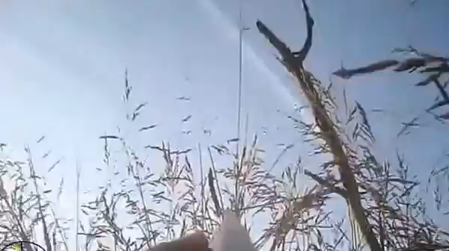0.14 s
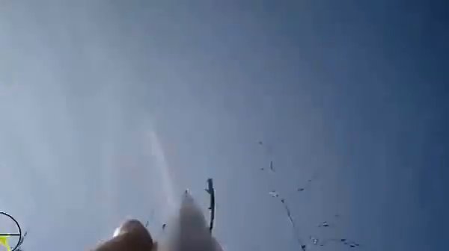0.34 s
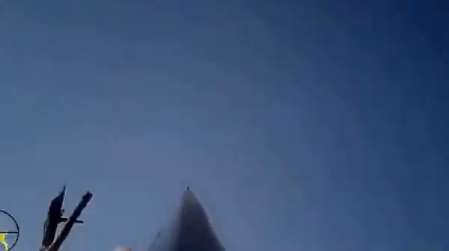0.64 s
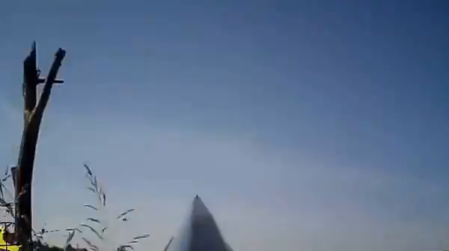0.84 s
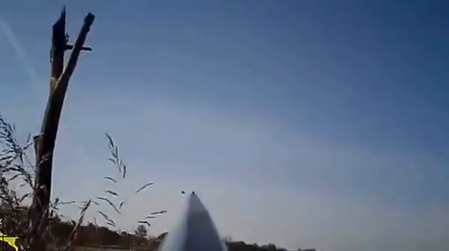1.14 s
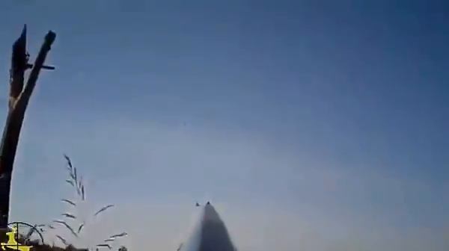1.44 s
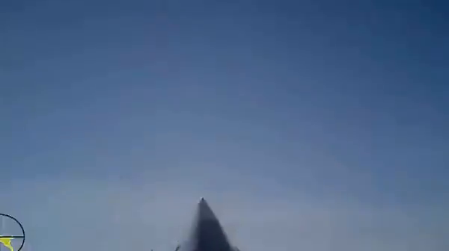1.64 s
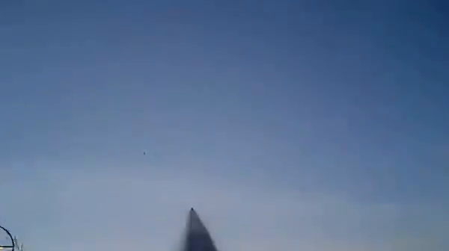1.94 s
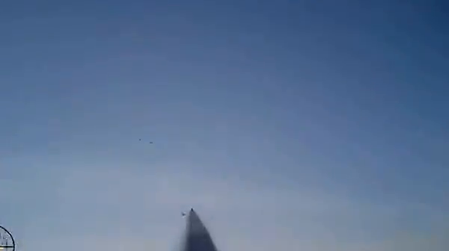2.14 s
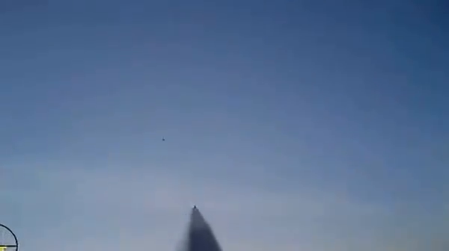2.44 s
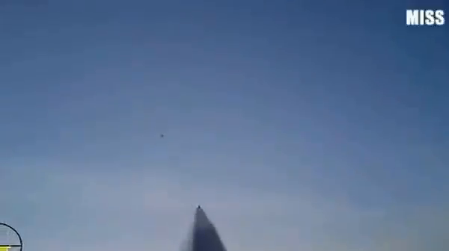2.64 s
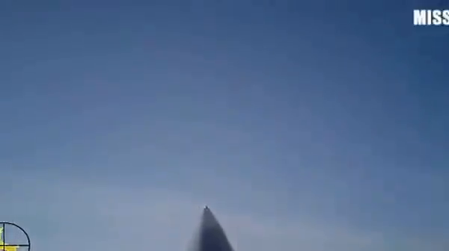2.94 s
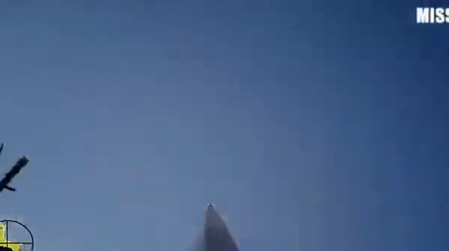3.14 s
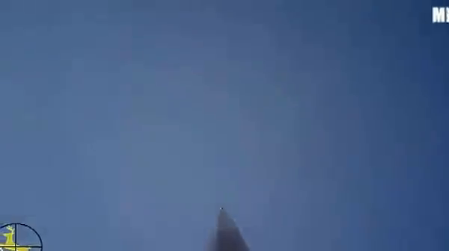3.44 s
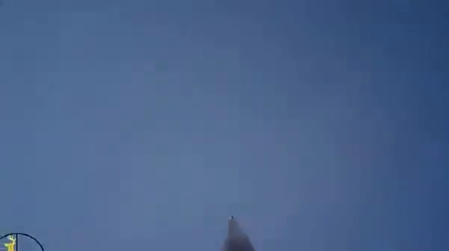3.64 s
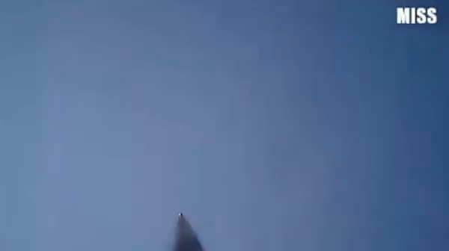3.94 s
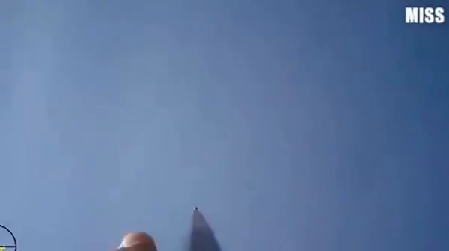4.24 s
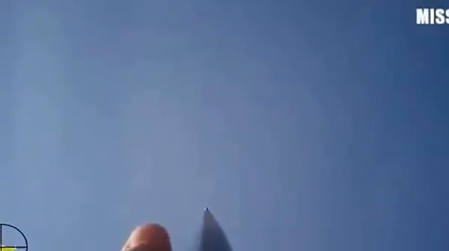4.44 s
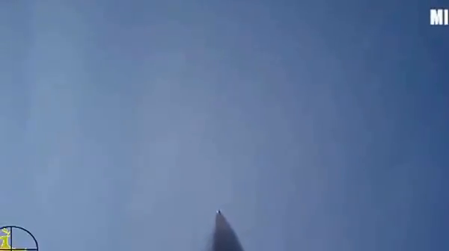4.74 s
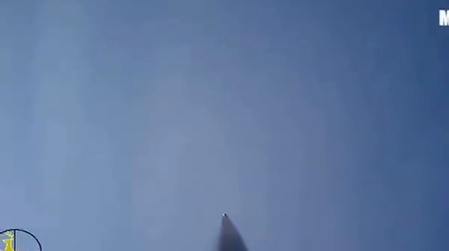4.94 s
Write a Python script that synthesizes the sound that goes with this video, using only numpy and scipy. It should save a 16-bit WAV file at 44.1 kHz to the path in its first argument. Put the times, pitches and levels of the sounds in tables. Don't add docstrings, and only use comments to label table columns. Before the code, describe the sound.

A pump shotgun fires three times very close to the microphone, its steel action clicking and slamming over faint breeze and grass rustle.

```python
import sys
import numpy as np
from scipy import signal
from scipy.fft import rfft, irfft, next_fast_len
from scipy.io import wavfile
from scipy.ndimage import uniform_filter1d, map_coordinates

SR = 44100
rng = np.random.default_rng(int(sys.argv[2]) if len(sys.argv) > 2 else 0)


def dump_mix(stems):
    frames = np.atleast_2d(stems).T
    limited = np.clip(frames, -1, 1)
    pcm = np.round(limited * 32767).astype(np.int16)
    wavfile.write(sys.argv[1], SR, pcm)


def ratio(d):
    e = np.asarray(d, float) / 20
    return 10 ** e


N = 225389

# start in seconds, gas roar in dB, hold in seconds, t60 in seconds,
# pressure push in dB.
SHOTS = [
    (0.7147, 3, 0.0059, 0.0082, 7),
    (1.6286, 6, 0.012, 0.036, 8.5),
    (2.401, -1.5, 0.0057, 0.056, 4.5),
]
# start in seconds, stock, body and bolt levels in dB, t60 in seconds.
RECOILS = [
    (.7157, 2, 4, -1.5, 0.03),
    (1.6287, -10, -3, 7, 0.06),
    (1.652, -7.5, -2.5, -16.5, 0.048),
    (2.4027, 14, -2, 8, 0.017),
    (2.41, -8, 0, -9, 0.033),
]
# start in seconds, length in seconds, body in dB,
# bolt over body in dB.
SLIDES = [(0.475, 0.32, -47, -4.5), (0.7117, .007, -34, -7), (0.721, .024, -44, 16.5),
          (1.208, 0.073, -42.5, -5), (1.267, 0.021, -53, 8), (1.282, 0.018, -31.5, -9),
          (1.453, .04, -40, 1), (1.6227, .017, -22, -24), (1.651, 0.036, -28, 2.5),
          (1.739, 0.017, -26.5, -8), (1.998, 0.015, -27, -13), (2.291, 0.017, -46, 24.5),
          (2.338, 0.019, -28, -5), (2.358, 0.0087, -18, -3), (2.386, .007, -22, 4), (2.392, 0.011, -25, -9),
          (2.826, 0.046, -25.5, -4.5), (2.88, 0.016, -21, -4), (2.922, 0.0066, -24, -8),
          (2.948, 0.057, -28.5, -11), (2.997, 0.016, -14.5, -5), (3.015, 0.052, -23.5, -5.5),
          (3.456, .01, -41, -22), (3.981, 0.032, -42, -6.5), (4.234, .033, -37, -.5),
          (4.266, 0.016, -37, -3), (4.455, 0.26, -51.5, -8)]
# start in seconds, pitch in Hz, level in dB,
# t60 in seconds.
RINGS = [(0.1215, 2000, -0.5, 0.012), (.1213, 1424, -3.5, 0.0096), (0.1212, 1113, -25, 0.021),
         (.122, 1144, -43, 0.27), (.1222, 693, -44, 0.16), (.349, 2410, -14.5, 0.011),
         (0.349, 587, -30.5, 0.03), (.717, 450, -4, 0.041), (1.254, 14300, -25, .025),
         (1.258, 1356, -13.5, 0.026), (1.2575, 2730, -13, 0.016), (1.468, 1850, -17, 0.041),
         (2.0644, 265, -17.5, 0.039), (2.293, 126, -18, 0.026), (2.296, 12300, -36, 0.03),
         (2.387, 1220, 11.5, 0.016), (2.405, 1250, 2, 0.043), (2.7298, 7800, 11, 0.0023),
         (3.9815, 967, -17.5, 0.019), (2.7288, 13100, -3, 0.0047), (2.833, 130, -24, 0.029),
         (3.032, 218, -22.5, 0.079), (3.4473, 945, -14.5, 0.014), (3.9806, 4740, -21, 0.017),
         (3.9816, 1934, 4, 0.01), (3.982, 665, -37, 0.3), (3.982, 1740, -21.5, 0.079),
         (4.2383, 753, -21, 0.028), (4.2692, 1250, -29, 0.045), (5.1, 525, -44, 0.011)]
# start in seconds, body in dB, bolt over body in dB, t60 in seconds.
SLAMS = [(.4359, -28, -7, 0.011), (1.2546, -26.5, -2, 0.048), (1.421, -28.5, -8.5, 0.021),
         (1.4686, -38, -5, .05), (1.4731, -26, -1, 0.018), (1.6785, -29, -1, .018), (1.7215, -21, -6, .012),
         (1.8575, -18, -11, 0.0062), (2.0233, -17, -1.5, 0.019), (2.029, -9.5, -8.5, 0.024),
         (2.0635, 2, -4, 0.015), (2.287, 1, 0, .005), (2.2946, -7.5, 2.8, 0.022), (2.353, -16.5, -7, 0.017),
         (2.389, -5.5, -8, 0.019), (2.4341, -15.5, -13, 0.016), (2.7295, -44.5, 34, 0.0056),
         (2.8244, -16, -13, 0.013), (3.002, -20.5, 8, 0.0088), (3.0237, -28, -3, .012),
         (3.0316, -7.5, 1.5, .011), (3.0452, -11, 1, 0.011), (3.525, -21.5, -3.5, 0.0035),
         (3.9808, -7, -1.5, 0.0067), (4.2385, -31, 1, 0.024), (4.2737, -46, 2.5, 0.076)]
# start in seconds, body in dB,
# bolt over body in dB, t60 in seconds.
CATCHES = [(0.1209, -11, -5.5, 0.012), (.3486, -18, -4.5, 0.015), (.4501, -39, -1, .008),
           (0.4867, -34, -18, 0.012), (0.5623, -32.5, -12, 0.037), (0.6422, -24, -11, .0055),
           (0.7426, -12.5, -11, 0.0063), (0.9632, -28, -14, .028), (1.2365, -29, 0.5, 0.012),
           (1.736, -22, 4, 0.015), (1.862, -22.5, -28, 0.02), (2.013, -19.5, -1, .01),
           (2.0489, -21.5, -16, 0.038), (2.269, -14.5, -9, 0.013), (2.3656, -24, 5, 0.064),
           (2.381, -7.5, -2.5, 0.017), (2.832, -7.5, -31, 0.012), (2.8339, 1.5, -2.5, 0.0044),
           (2.846, -22, -8, .025), (2.8548, -24, -2, 0.0092), (2.8601, -6.5, 0, 0.0077),
           (2.8846, -24, -6.5, .0054), (2.8904, -27.5, 20, 0.0081), (2.894, -22, 5, 0.0051),
           (2.9214, -24.5, 8, 0.013), (2.9717, -13.5, -10.5, 0.017), (3.0173, -53, 1, 0.025),
           (3.4184, -46, 8.5, .004), (4.4807, -29, -7, .007), (4.6006, -29, -6, .006)]
# start in seconds, body in dB, t60 in seconds.
TAPS = [(0.216, -50, 0.023), (0.4946, -38, 0.007), (.5128, -30, 0.0088), (0.5507, -28, 0.0064),
        (.6714, -35, 0.008), (.686, -22.5, 0.0071), (.8904, -39, .008), (1.0017, -24, .007),
        (1.1102, -39, 0.0037), (1.2893, -31, 0.0032), (1.6853, -24, 0.043), (1.9386, -16, 0.008),
        (2.2084, -29, 0.0075), (2.2123, -38, .013), (2.6824, -24.5, 0.018), (2.7051, -24, 0.023),
        (2.754, -24.5, 0.0075), (2.7938, -27, .006), (3.447, -14, 0.01), (3.463, -33, .021),
        (3.4666, -24.5, 0.011), (3.5666, -31.5, 0.013), (3.5724, -33, 0.0032), (4.4055, -42, .0045),
        (4.412, -35.5, 0.0093), (4.5887, -31, 0.0046)]

# centre in Hz, width in Hz, level in dB.
BODY_MODES = [(1250, 1040, -2.5), (1850, 680, 3), (2354, 276, 4.5), (2532, 422, 0)]
# centre in Hz, width in Hz, level in dB.
STOCK_MODES = [(184, 155, -3), (450, 207, 1), (680, 236, 1.5), (971, 370, -4)]
# centre in Hz, width in Hz, level in dB.
BOLT_MODES = [(4210, 770, 2), (5310, 900, 0), (5790, 640, 3), (7035, 1800, -20)]
# centre in Hz, width in Hz, level in dB.
THIN_MODES = [(7800, 1500, -6.5), (10130, 1000, 2.5), (12300, 2260, 5.5), (14300, 1500, 4)]
# centre in Hz, width in Hz, level in dB.
SHELL_MODES = [(765, 1300, -2), (1830, 320, 8), (2610, 190, -3.5), (4090, 410, 2.5), (6140, 280, -5)]
PART_LASTS = [
    [0.96],
    [0.94],
    [1],
    [.6],
]

# frequency in Hz, density in dB per Hz.
ROAR = [(100, 13), (500, 1.5), (2000, 3.5), (6000, -5.5), (15000, -11)]
# frequency in Hz, density in dB per Hz.
LAND = [(35, -49), (60, -18.5), (460, -8.5), (608, -4.5), (1610, -8), (2220, -6.5), (2500, -4),
        (2940, -6.5), (6020, -6), (8920, -8), (14200, -9.5), (15200, -31)]
# frequency in Hz, density in dB per Hz.
BREEZE = [(12, -34), (20, -15), (128, -4), (155, -14), (329, -7.5), (500, -16), (650, -45.5), (1100, -120)]
# frequency in Hz, density in dB per Hz.
GRASS = [(210, -13.5), (350, -11.5), (470, -10), (648, -12.5), (1080, -14.5), (1180, -11), (2250, -18),
         (2520, -17), (3060, -23), (4320, -21), (7500, -27.5), (9750, -55), (16500, -120)]
# frequency in Hz, density in dB per Hz.
HISS = [(3820, -25), (6500, -8), (9070, -7), (11200, -4.5), (13600, -5.5), (14300, -0.5), (15300, -5.5)]
# time after the blast in seconds, level in dB.
ROLL = [(.004, -51), (.03, -32.5), (.08, -32.5), (.16, -36), (.24, -33.5), (.43, -39), (.52, -43.5),
        (.68, -46), (.8, -49.5)]
# time in seconds, rustle in dB.
STIR = [(0, -48), (.4, -45.5), (.6, -46.5), (.7, -43.5), (1.3, -50.5), (1.44, -41), (1.6, -46.5),
        (2.1, -48), (2.33, -41.5), (3.07, -54.5), (3.25, -42), (3.45, -43.5), (3.75, -48.5), (4.0, -50),
        (4.5, -48.5), (4.92, -48), (5.11, -45.5)]

SLAM_STOCK_DB, SLAM_THIN_DB = -12, 0.5
CATCH_STOCK_DB, CATCH_THIN_DB = -14.5, -13.5
TAP_STOCK_DB, TAP_BOLT_DB, TAP_THIN_DB = -3, -32, -18
SLIDE_STOCK_DB, SLIDE_THIN_DB = -9.5, -7
HISS_PATCH_DB = 0.4


def unit(x):
    return x / np.sqrt(np.mean(np.abs(x) ** 2) + 1e-20)


def along(points, hz):
    f, v = np.transpose(points)
    return np.interp(np.log(hz + 1), np.log(f + 1), v)


def curves(rows):
    s, *cols = np.transpose(rows)
    return [np.interp(np.arange(N) / SR, s, c, left=-120, right=-120) for c in cols]


def wobble(rate):
    knots = rng.standard_normal(int(N * rate / SR) + 4)
    return map_coordinates(knots, [np.arange(N) * rate / SR])


def filtered(x, response):
    m = next_fast_len(len(x) + SR // 4)
    gain = unit(response(np.fft.rfftfreq(m, 1 / SR)))
    return irfft(rfft(x, m) * gain, m)[:len(x)]


def resonances(modes):
    def response(f):
        total = 0
        for k, (centre, width, db) in enumerate(modes):
            damping = 1j * f * width
            total = total + (-1) ** k * ratio(db) * damping / (centre * centre - f * f + damping)
        return total
    return response


def rush(spectrum, patchy_db, loss_db=None):
    hz, t, z = signal.stft(rng.standard_normal(N), SR, nperseg=512)
    patches = uniform_filter1d(rng.standard_normal(z.shape), size=6, axis=0)
    patches = uniform_filter1d(patches, size=8, axis=1)
    z = z * ratio(patchy_db * unit(patches) + along(spectrum, hz)[:, None])
    if loss_db:
        z = z * ratio(-loss_db(t) * (hz[:, None] / 7850.0) ** 2)
    return unit(signal.istft(z, nperseg=512)[1][:N])


def field():
    rustle_db, = curves(STIR)
    breeze = ratio(-53.5 + 1.0 * wobble(34)) * rush(BREEZE, patchy_db=-2.5)
    gusts_db = 0.9 * wobble(23) + 1.3 * wobble(300)
    rustle = ratio(rustle_db - 3.0 + gusts_db) * rush(GRASS, patchy_db=1.5)
    hiss_db = -57.5 + 0.51 * (rustle_db - rustle_db.mean())
    return breeze + rustle + ratio(hiss_db) * rush(HISS, HISS_PATCH_DB)


def contacts():
    rows = []
    for s, db, up, t60 in SLAMS:
        rows.append((s, db, db + SLAM_STOCK_DB, db + up, db + up + SLAM_THIN_DB, t60))
    for s, db, up, t60 in CATCHES:
        rows.append((s, db, db + CATCH_STOCK_DB, db + up, db + up + CATCH_THIN_DB, t60))
    for s, db, t60 in TAPS:
        bolt_db = db + TAP_BOLT_DB
        rows.append((s, db, db + TAP_STOCK_DB, bolt_db, bolt_db + TAP_THIN_DB, t60))
    return rows


def impacts():
    t = np.arange(SR // 16) / SR
    shakes = np.zeros((4, N + SR))
    for s, *levels_db, t60 in contacts():
        lasts = np.clip(t60 * np.array(PART_LASTS), 0.002, 0.06)
        shape = (1 - np.exp(-t / 0.00044)) * ratio(-60 * t / lasts)
        burst = shape * rng.standard_normal((4, len(t)))
        burst *= np.linalg.norm(shape, axis=1, keepdims=True) / np.linalg.norm(burst, axis=1, keepdims=True)
        shakes[:, round(s * SR):][:, :len(t)] += ratio(np.array(levels_db) + 4.5)[:, None] * burst
    return shakes[:, :N]


def slides():
    now = np.arange(N) / SR
    strokes = np.zeros((4, N))
    for start, length, db, up in SLIDES:
        rise = (now - start) / 0.00088
        ease = (start + length - now) / (0.5 * length)
        stroke = np.clip(np.minimum(rise, ease), 0, 1)
        strokes += ratio([[db], [db + SLIDE_STOCK_DB], [db + up], [db + up + SLIDE_THIN_DB]]) * stroke
    return strokes * rng.standard_normal((4, N)) * ratio(2.5 * wobble(500))


def struck(shake, modes, edge_hz):
    def response(f):
        small = (1j * f / edge_hz / (1 + 1j * f / edge_hz)) ** 4
        return resonances(modes)(f) * small
    return filtered(shake, response)


def action():
    shakes = impacts() + slides()
    body = struck(shakes[0], BODY_MODES, edge_hz=255)
    stock = struck(shakes[1], STOCK_MODES, edge_hz=63)
    bolt = struck(shakes[2], BOLT_MODES, edge_hz=2800)
    thin = struck(shakes[3], THIN_MODES, edge_hz=3600)
    return body + stock + bolt + thin


def rings():
    out, t = np.zeros(N + SR), np.arange(SR // 4) / SR
    for s, hz, db, t60 in RINGS:
        envelope = ratio(db - 60 * t / t60) * (1 - np.exp(-t / 0.00039))
        out[round(s * SR):][:len(t)] += envelope * np.sin(2 * np.pi * hz * t)
    return out[:N]


def blasts():
    out, t = np.zeros(N + SR), np.arange(SR // 4) / SR
    for s, db, hold, t60, push_db in SHOTS:
        gas = filtered(rng.standard_normal(len(t)), lambda hz: ratio(along(ROAR, hz)))
        roar = ratio(db - 60 * np.maximum(t - hold, 0) / t60) * (1 - np.exp(-t / 0.00048)) * gas
        u = (t - hold) / 0.0018
        push = ratio(push_db) * (0.35 * u * u - 1) * np.exp(-0.5 * u * u)
        out[round(s * SR):][:len(t)] += roar + push
    return out[:N]


def recoils():
    out, t = np.zeros(N + SR), np.arange(SR // 4) / SR
    for s, *levels_db, t60 in RECOILS:
        envelope = ratio(-60 * t / t60) * (1 - np.exp(-t / 0.001))
        jolts = envelope * rng.standard_normal((3, len(t)))
        for jolt, db, modes in zip(jolts, levels_db, (STOCK_MODES, BODY_MODES, BOLT_MODES)):
            out[round(s * SR):][:len(t)] += ratio(db) * filtered(jolt, resonances(modes))
    return out[:N]


def echo():
    fired = np.array([row[0] for row in SHOTS])

    def age(t):
        latest = np.maximum(np.searchsorted(fired, t) - 1, 0)
        return np.maximum(t - fired[latest], 0)

    roll = rush(LAND, patchy_db=-0.2, loss_db=lambda t: 60 * age(t))
    roll = 0.65 * roll + 0.74 * filtered(roll, resonances(SHELL_MODES))
    lumps = ratio(1.5 * wobble(35.9) + 1.53 * wobble(250))
    level = sum(ratio(curves(np.add(ROLL, (s, 0)))[0]) for s in fired)
    far = ratio(2.5) * level * unit(roll * lumps)
    since = age(np.arange(N) / SR)
    near = (since > 0) * ratio(-32 - 60 * since / 0.42) * rush(HISS, HISS_PATCH_DB)
    return far + near


def ducking(loud):
    knee_db, recover_s = -16.5, 0.025
    keep = np.exp(-1 / (recover_s * SR))
    power = signal.lfilter([1 - keep], [1, -keep], loud ** 2)
    return 1 / np.sqrt(1 + power / ratio(knee_db) ** 2)


def scene():
    steel = action()
    background = ducking(steel) * (echo() + field())
    return (blasts() + recoils() + steel + rings() + background)[None]


def top_cut(x):
    return signal.sosfilt(signal.butter(12, 16470, fs=SR, output="sos"), x)


def record(dry):
    clipped = dry / (1 + np.abs(dry / 0.61) ** 8) ** (1 / 8)
    fall = signal.butter(15, 15100, fs=SR, output="sos")
    mix = signal.sosfiltfilt(fall, clipped)
    return top_cut(mix)


dry = scene()
out = record(dry)
dump_mix(out)
```